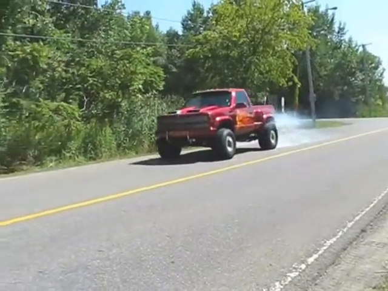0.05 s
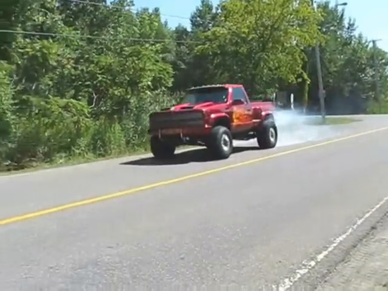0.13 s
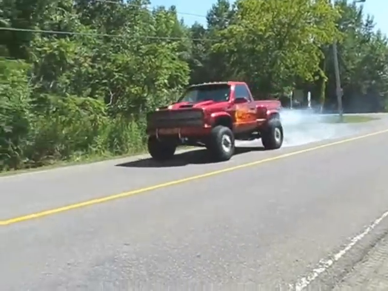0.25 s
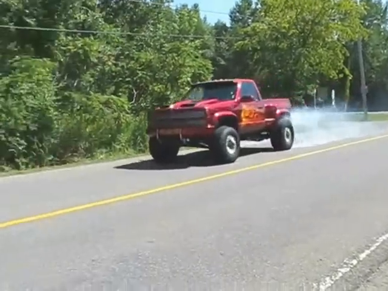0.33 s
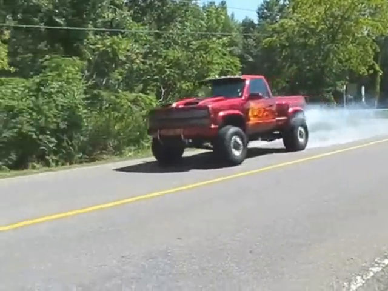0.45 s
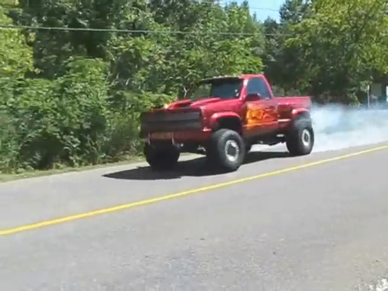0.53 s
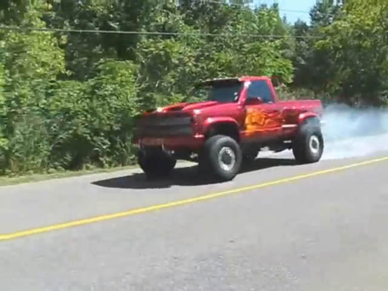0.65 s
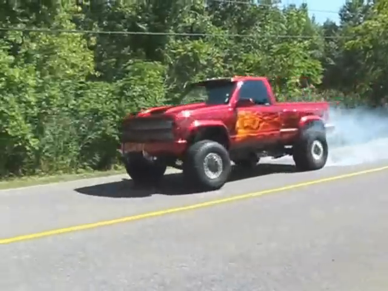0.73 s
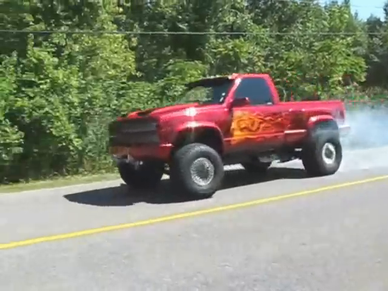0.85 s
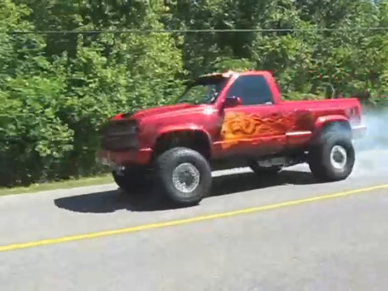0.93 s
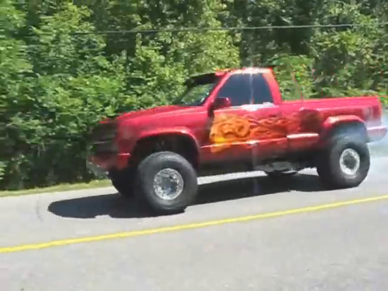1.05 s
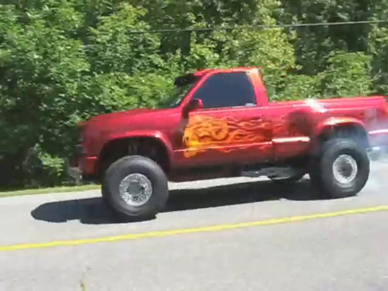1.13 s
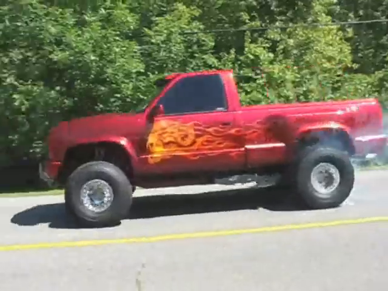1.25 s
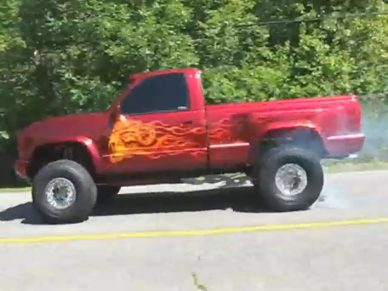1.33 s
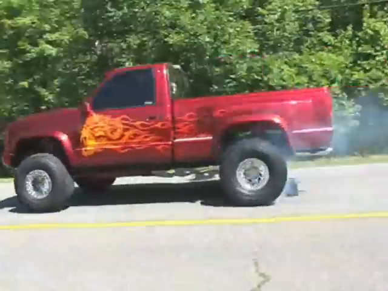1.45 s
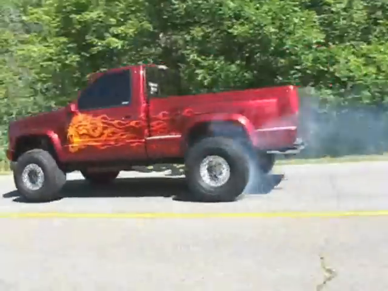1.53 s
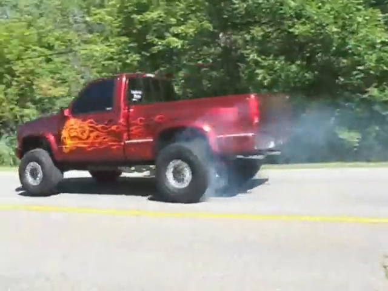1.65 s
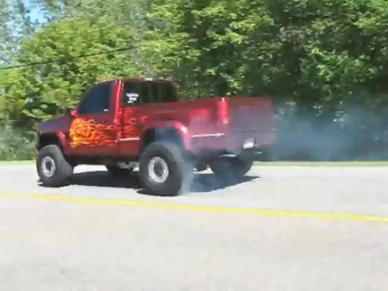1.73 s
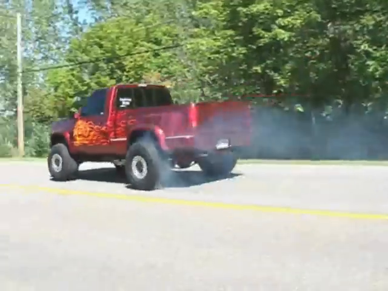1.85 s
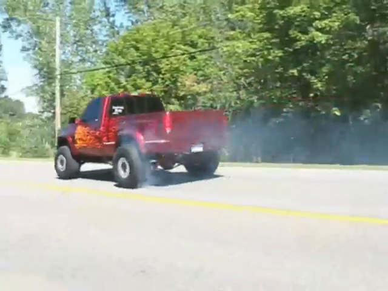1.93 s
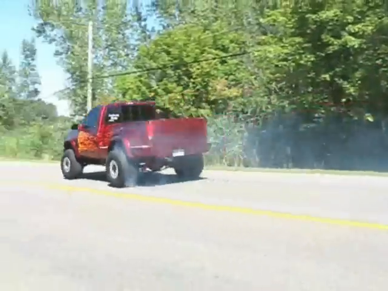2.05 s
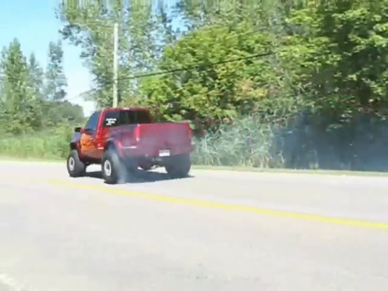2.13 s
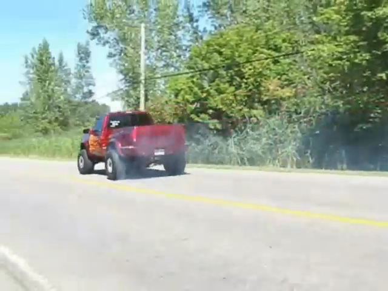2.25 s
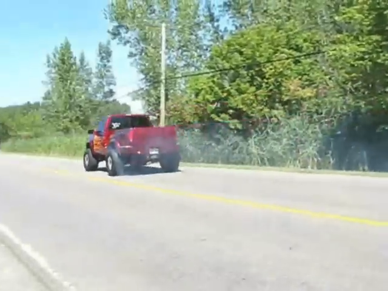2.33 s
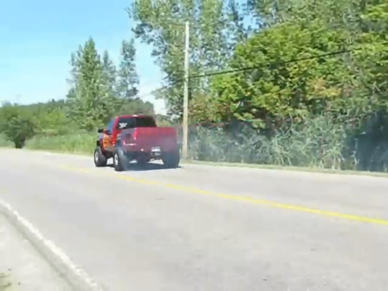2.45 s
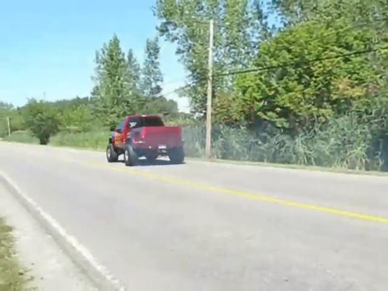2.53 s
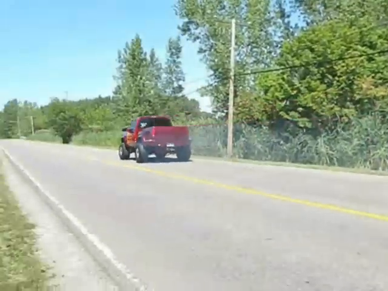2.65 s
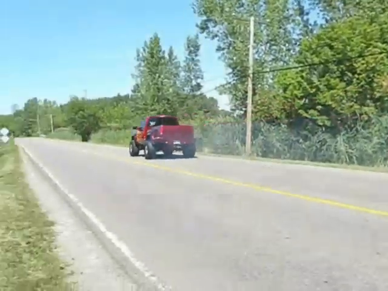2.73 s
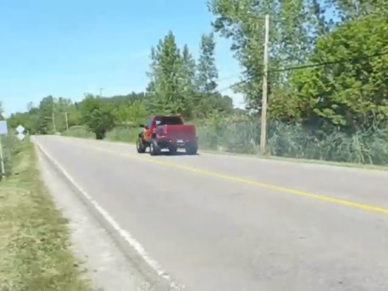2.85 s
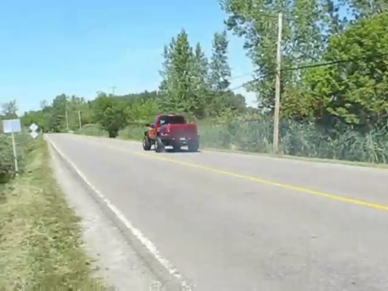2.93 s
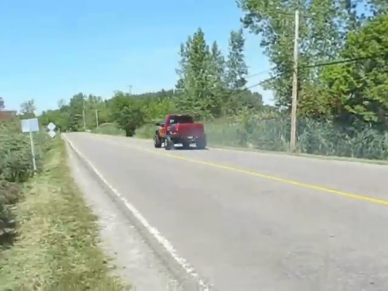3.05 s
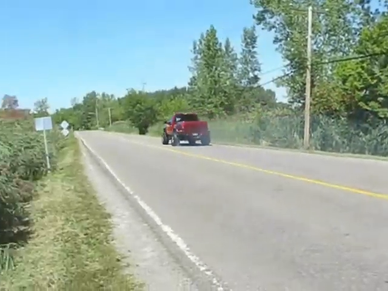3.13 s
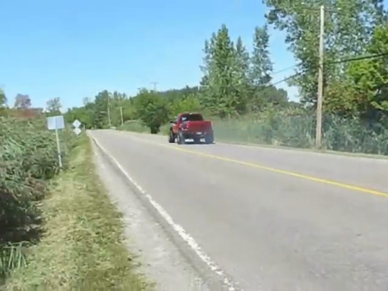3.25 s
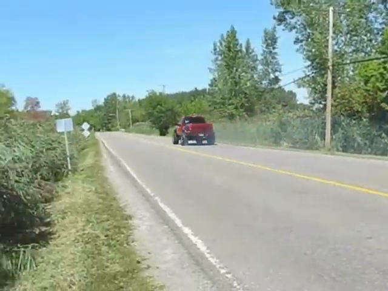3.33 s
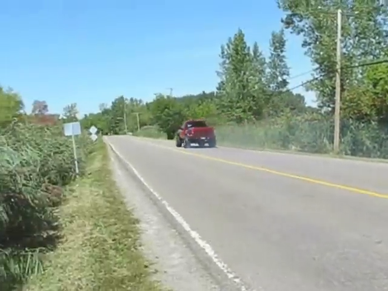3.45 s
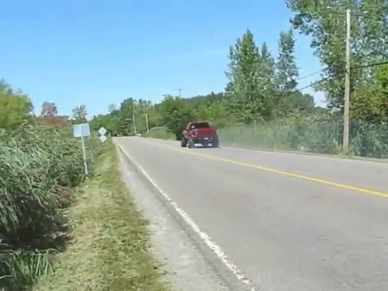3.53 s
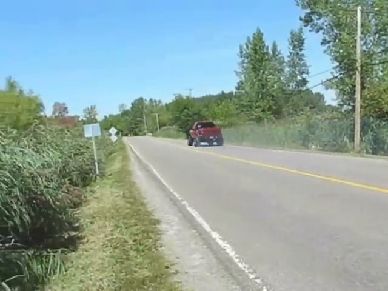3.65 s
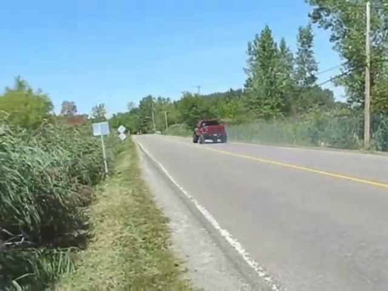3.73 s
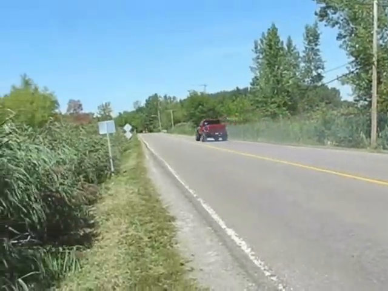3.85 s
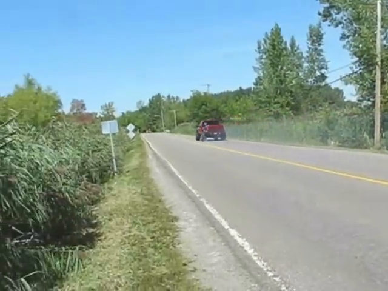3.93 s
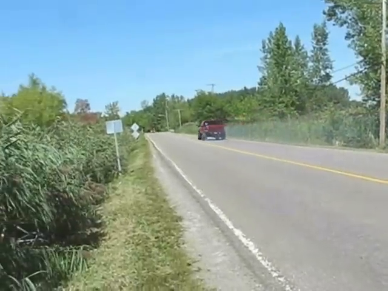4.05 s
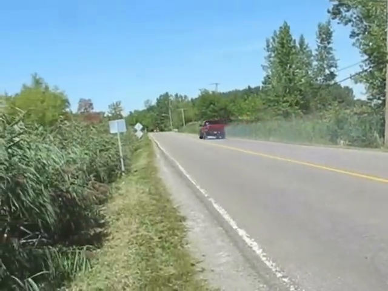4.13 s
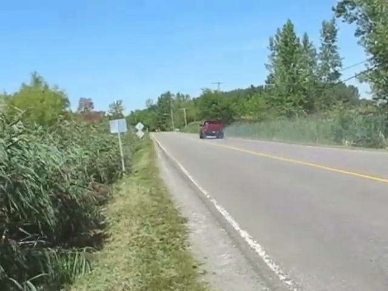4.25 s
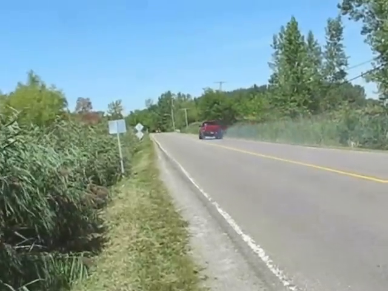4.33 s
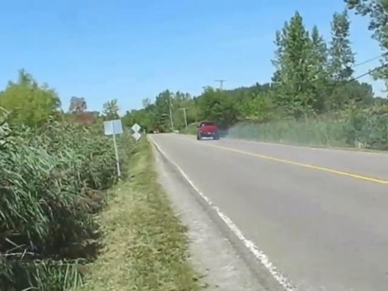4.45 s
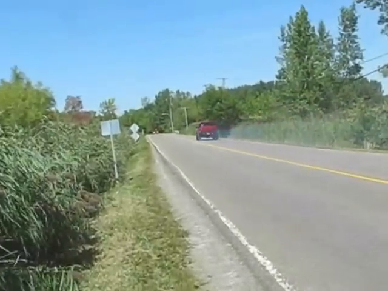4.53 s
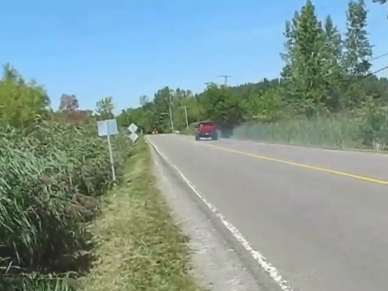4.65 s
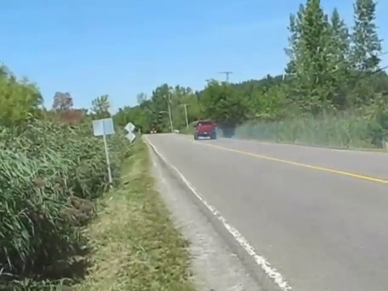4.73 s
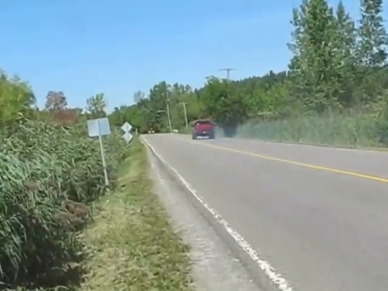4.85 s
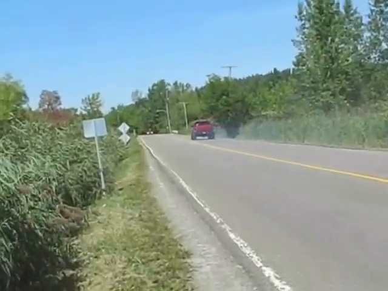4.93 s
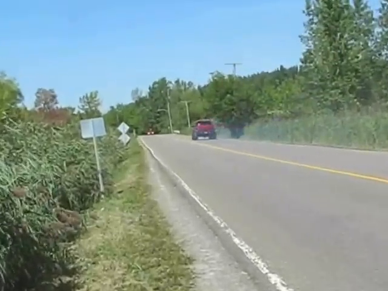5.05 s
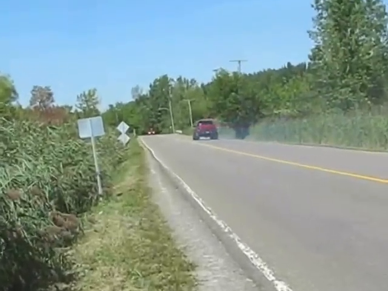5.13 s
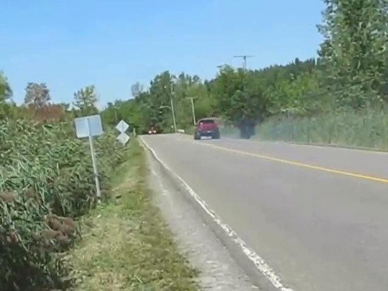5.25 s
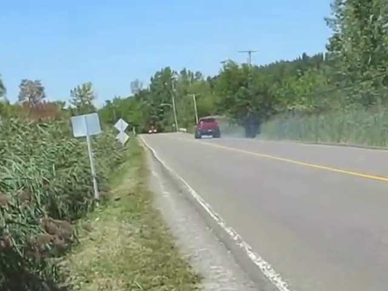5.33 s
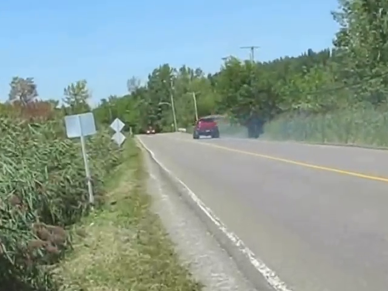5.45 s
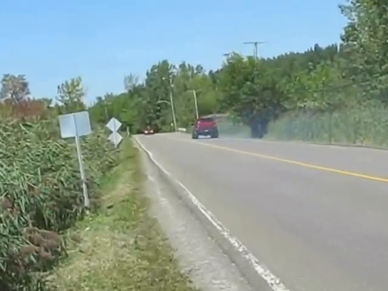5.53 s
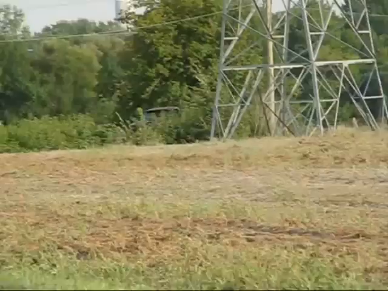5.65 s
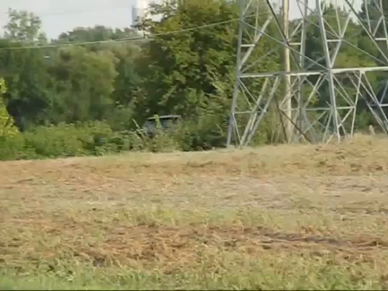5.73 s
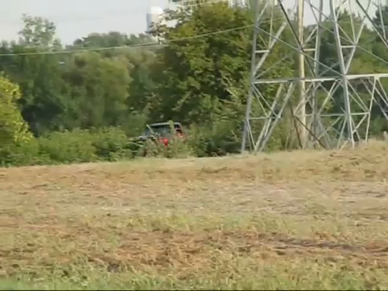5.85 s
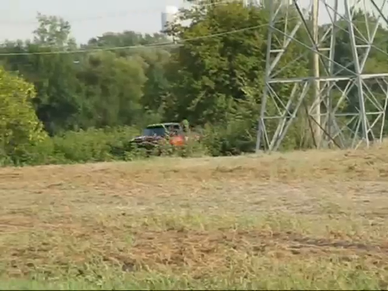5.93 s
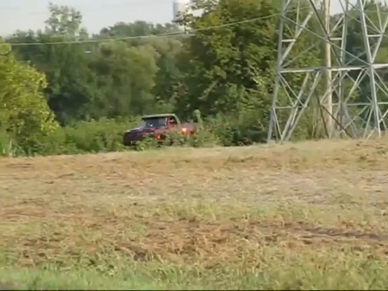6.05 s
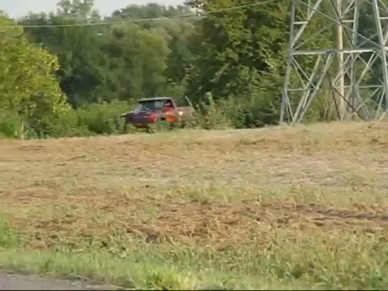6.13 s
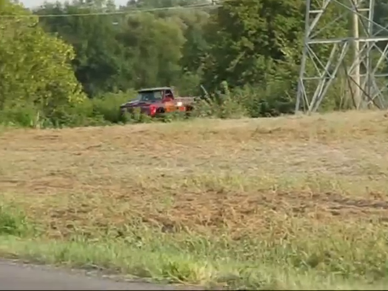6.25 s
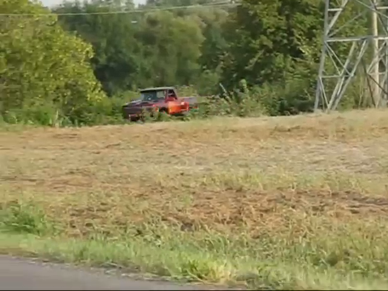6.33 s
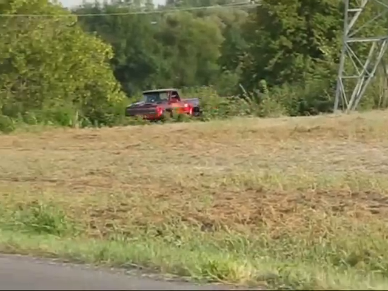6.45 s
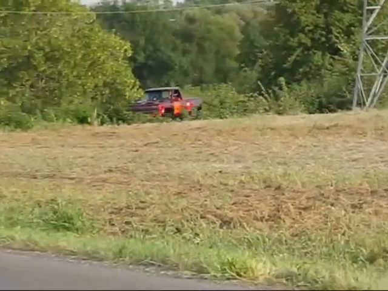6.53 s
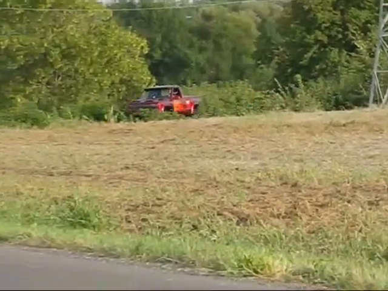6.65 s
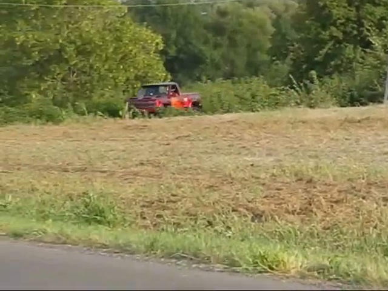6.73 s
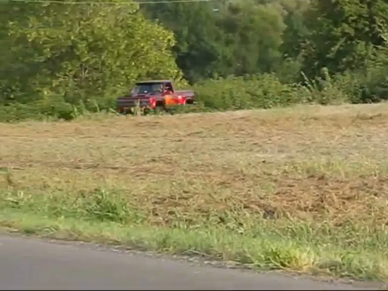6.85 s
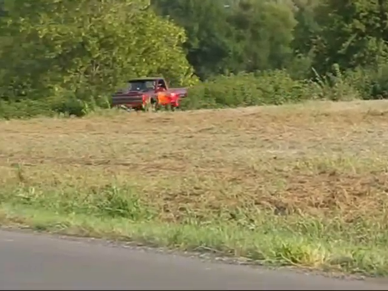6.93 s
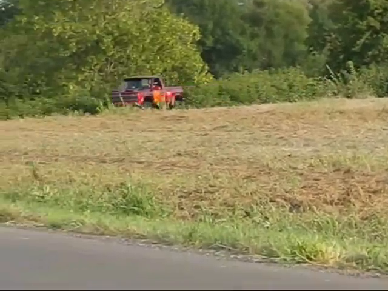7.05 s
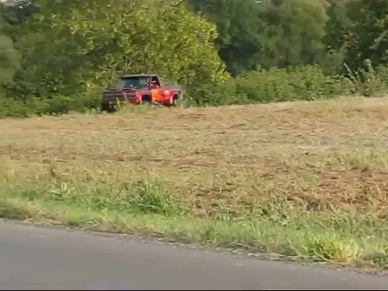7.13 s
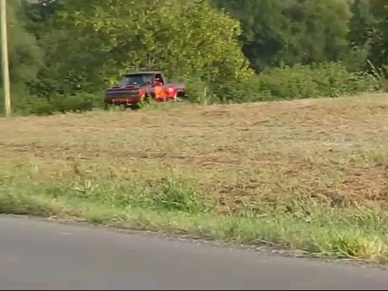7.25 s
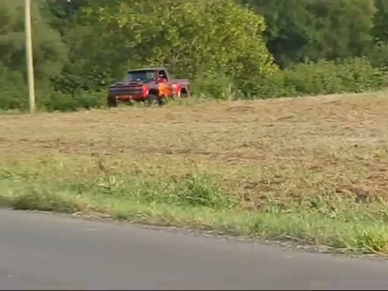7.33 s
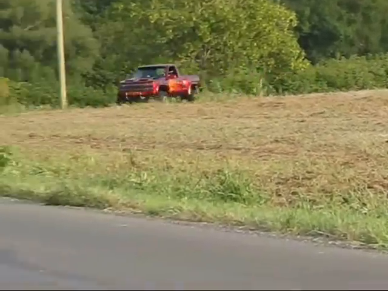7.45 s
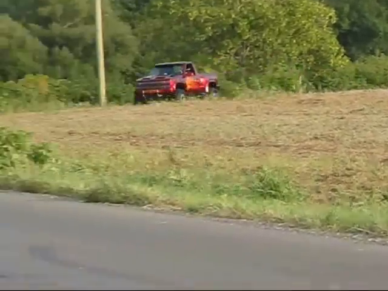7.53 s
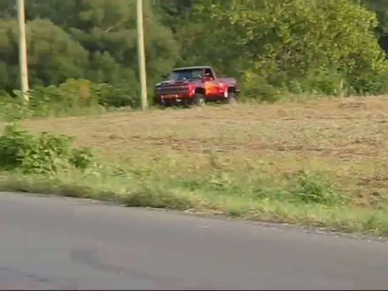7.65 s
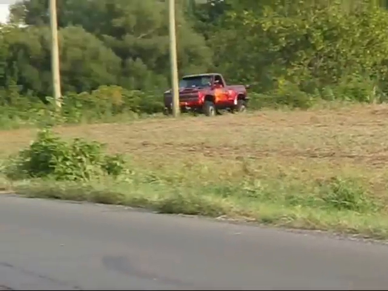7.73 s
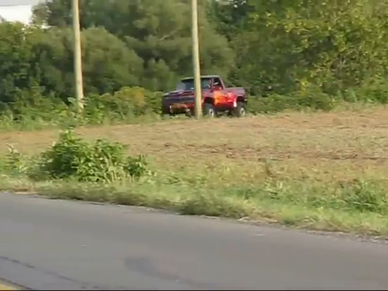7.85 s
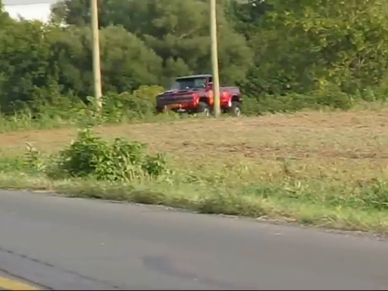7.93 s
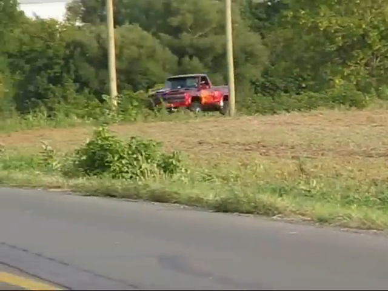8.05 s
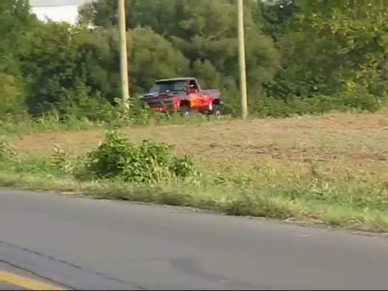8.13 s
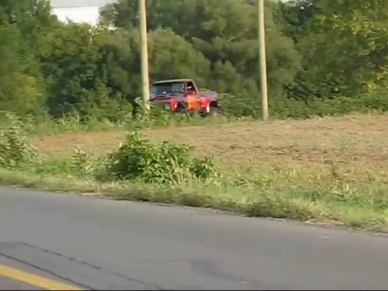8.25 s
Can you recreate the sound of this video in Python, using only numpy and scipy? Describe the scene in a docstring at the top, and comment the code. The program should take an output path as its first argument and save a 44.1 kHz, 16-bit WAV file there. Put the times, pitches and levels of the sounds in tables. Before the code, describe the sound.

From 0 s a big V8 pickup is already loud and approaching, its gravelly exhaust revving high with short throttle dips near 0, 0.7 and 1 s, over a faint, wavering tyre squeal. Around 1.3-2.3 s it passes close: heavy boom, broadband roar and hiss, slightly flattened peaks, and a strong mid-high squeal of spinning rubber. At about 2.5 s the throttle lifts, with a raspy burst as revs fall; by 2.9 s it pulls again in the next gear, fluttering slightly, then climbing steadily and fading. At 4.9 s it lifts off; irregular pops, then regular sharp cracks, run until 5.8 s. An abrupt cut reveals a quiet field. A distant muffled engine burbles low, picks up at 6.2 s and steadily deepens in power and rises to 8.3 s. Nearby crickets chirp in short groups around 5.9, 6.7 and 7.4 s, over faint ticking, thin trilling, and growing low wind buffets.

```python
"""A big V8 pickup spins its tyres past the roadside, shifts up, pulls away and lifts off, its exhaust cracking;
then, heard across a field, it accelerates from low revs while crickets and grasshoppers sing nearby.
The exhaust is multiples of the engine cycle, noise gated by the firings, and filtered pulse fronts.
Tyres and trill are narrow noise bands, insect strokes short gliding tones, wind a low band of noise around 60 Hz.
An overdriven input stage flattens the loudest peaks."""
import sys
import numpy as np
from scipy import signal
from scipy.fft import rfft, irfft, next_fast_len
from scipy.io import wavfile
from scipy.ndimage import uniform_filter1d

SR = 44100
rng = np.random.default_rng(int(sys.argv[2]) if len(sys.argv) > 2 else 0)


def store_wav(level_fs):
    """Save 16-bit WAV to argv[1]."""
    pcm = np.round(np.clip(np.atleast_2d(level_fs), -1, 1) * 32767)
    wavfile.write(sys.argv[1], SR, pcm.T.astype(np.int16))


N = 365148

CUT_S = 5.782  # road before, field after

# engine cycles per second, eight firings each: (t/s, f/Hz)
CYCLE_RATE = [(0, 47.5), (.08, 46.5), (.19, 48.1), (.37, 52.7), (.59, 54.1), (.69, 53.3), (.77, 48.7),
              (.94, 50.6), (1.02, 49.5), (1.26, 53), (1.78, 53), (1.91, 52.3), (2.49, 50.8), (2.545, 45.8),
              (2.85, 33.8), (2.9, 39.6), (2.965, 41), (2.99, 33.4), (3.05, 34), (3.12, 39), (3.2, 36),
              (3.28, 38), (3.67, 40.4), (4.17, 43), (4.49, 43.1), (4.86, 43.8), (4.91, 42.6), (4.97, 37.4),
              (5.15, 27.3), (5.3, 29.97), (5.44, 28.7), (5.78, 28.3), (5.79, 17), (6.1, 14.5), (6.27, 23),
              (6.45, 23.3), (6.56, 20.8), (6.66, 22.9), (6.96, 23.7), (7.44, 25.7), (7.62, 25.9),
              (7.69, 27.5), (8.05, 28.7), (8.28, 30.3)]


def amp(db):
    """Level in dB to amplitude."""
    return 10 ** (np.asarray(db) / 20)


def unit(x):
    """x scaled to rms 1."""
    return x / np.sqrt(np.mean(x ** 2) + 1e-20)


def along(points, hz):
    """(f/Hz, value) points interpolated on a log frequency axis."""
    f, v = np.transpose(points)
    return np.interp(np.log(hz + 1), np.log(f + 1), v)


def curves(rows):
    """One value per sample for each column after the time."""
    s, *cols = np.transpose(rows)
    return [np.interp(np.arange(N) / SR, s, c) for c in cols]


def wobble(knots_per_s):
    """Random curve, linear between normally distributed knots."""
    knots = rng.standard_normal(int(N * knots_per_s / SR) + 4)
    return np.interp(np.arange(N) * knots_per_s / SR, np.arange(len(knots)), knots)


def filtered(x, response):
    """x times a complex response of frequency."""
    m = next_fast_len(N + SR // 2)
    return irfft(rfft(x, m) * response(np.fft.rfftfreq(m, 1 / SR)), m)[..., :N]


def rush(spectrum, patchy_db):
    """Stereo noise of rms 1, wider apart left and right in the treble, with time-frequency patches of random
    gain."""
    # left-right likeness: (f/Hz, correlation)
    likeness = [(60, 0.73), (180, 1), (550, 0.87), (1650, 0.75), (4970, 0.22), (15000, 0.24)]
    z = signal.stft(rng.standard_normal((2, N)), nperseg=512)[2]
    patches = uniform_filter1d(rng.standard_normal(z.shape[1:]), 6, 0)
    patches = unit(uniform_filter1d(patches, 10, 1))
    pair = signal.istft(z * amp(patchy_db * patches), nperseg=512)[1][:, :N]

    def mid_side(hz):
        angle = np.arccos(np.clip(along(likeness, hz), -1, 1)) / 2
        return amp(along(spectrum, hz)) * [np.cos(angle), np.sin(angle)]

    mid, side = filtered(pair, mid_side)
    return unit(np.array([mid + side, mid - side]))


def fuzzy_band(rows, width_hz):
    """Noise in a narrow band that follows (t/s, f/Hz, level/dB) rows, silent outside them."""
    hz, db = curves(rows)
    fuzz = unit(filtered(rng.standard_normal((2, 2, N)), lambda f: 1 / (1 + (f / width_hz) ** 2)))
    fuzz = fuzz + 0.34 * fuzz[:, ::-1]  # partly alike left and right
    phase = 2 * np.pi * np.cumsum(hz) / SR
    t = np.arange(N) / SR
    edge = np.clip(np.minimum(t - rows[0][0] + .01, rows[-1][0] - t) / 0.0075, 0, 1)
    return amp(db) * edge * (fuzz[0] * np.cos(phase) + fuzz[1] * np.sin(phase))


def crank():
    """Engine cycles turned: the integral of the cycle rate, zero at one sharp crack."""
    crack_s = 5.5996
    turns = np.cumsum(curves(CYCLE_RATE)[0]) / SR
    return turns - turns[round(crack_s * SR)]


def levels():
    """Boom, bark, roar and hiss in dB; each lift of the throttle pulls them down, and they snap back."""
    # layer levels: (t/s, boom/dB, bark/dB, roar/dB, hiss/dB)
    road_levels = [(0, -15.5, -15, -16.5, -17), (.63, -13.5, -12.5, -13, -11.5),
                   (.9, -13, -12.5, -11.5, -13), (1.1, -10, -15, -8.5, -11), (1.35, -5.5, -13.5, -8, -9),
                   (1.65, -5, -19.5, -8, -7.5), (1.8, -11, -11.5, -12, -4.5), (1.96, -10, -13.5, -24, -6),
                   (2.29, -8.5, -11, -13, -11.5), (2.5, -11, -14.5, -15, -15.5),
                   (2.64, -12.5, -15, -14.5, -8), (2.84, -11.5, -15, -15, -13), (2.9, -10, -12.5, -14, -13),
                   (3.1, -12, -18.5, -17.5, -20), (3.85, -15, -18.5, -20, -21.5),
                   (4.31, -15, -22.5, -23, -27), (4.9, -16.5, -26.5, -26.5, -29),
                   (4.95, -28.5, -34, -31.5, -35.5), (5.18, -37, -40, -29.5, -43),
                   (5.33, -31.5, -31.5, -28, -39), (5.775, -32.5, -29.5, -35.5, -40)]
    # the same columns across the field
    field_levels = [(5.785, -44, -47, -53, -55), (6.09, -45, -60, -63, -71), (6.16, -28.5, -49, -55, -64),
                    (6.27, -25, -43.5, -67, -73), (6.7, -26, -43, -63, -60), (7.07, -18.5, -40, -41.5, -64),
                    (7.4, -18, -38, -34.5, -56), (7.65, -21.5, -39, -43.5, -61),
                    (7.83, -18.5, -36.5, -31.5, -57), (8.28, -19, -34.5, -31, -50)]
    # throttle closes briefly: (t/s, length/s, drop before layer share/dB)
    lifts = [(0.035, 0.1, 3.5), (0.681, 0.12, 4.5), (.96, 0.076, 4), (2.51, 0.353, 5.5)]
    # share of a drop taken by boom, bark, roar, hiss: (factor)
    drop_share = [0.9, 1.38, 1.12, 0.36]
    close_s, open_s = 0.014, 0.0091
    sag_db_per_s = [5.6, 5, 4.1, 37]  # boom, bark, roar, hiss
    t, out = np.arange(N) / SR, np.array(curves(list(road_levels) + list(field_levels)))
    for s, length_s, drop_db in lifts:
        shut = np.clip(np.minimum((t - s) / close_s, (s + length_s - t) / open_s), 0, 1)
        out = out - shut * (np.outer(drop_share, [drop_db]) + np.outer(sag_db_per_s, t - s))
    return out


def tones(turns, first, last, scatter_db, drift_rad):
    """Multiples of the cycle at steady nominal power, wavering with unsteady firing, sliding through resonances."""
    # relative strength of the cycle's multiples, five sets: (multiple, level/dB)
    spinning = [(1, -19), (2, -10), (3, -4), (4, -2.5), (5, -1.5), (6, -1), (7, -29), (8, -11.5), (9, -2),
                (10, -7), (11, -24), (12, -16), (13, -13), (14, -3), (15, -11), (16, 1), (17, 4), (18, -1),
                (19, -15), (20, -9), (21, -9), (22, -1), (23, -22), (24, -15), (25, -17), (26, -24),
                (27, -15), (28, -19), (29, -9), (30, -3)]
    passing = [(1, -38), (2, -11.5), (3, -14.5), (4, -9), (5, -3), (6, -3.5), (7, -23), (8, 0), (9, -24),
               (10, -17.5), (11, -33), (12, -13), (13, -1), (14, 1), (15, -9), (16, -5.5), (17, -3),
               (18, -7), (19, -4), (20, -11), (21, -18), (22, -27), (23, -29), (24, -38), (25, -24),
               (26, -31), (27, -7), (28, -27), (29, -4), (30, -12)]
    leaving = [(1, -36), (2, -57), (3, -6.5), (4, -8.5), (5, 1), (6, -10.5), (7, -18.5), (8, -7.5),
               (9, -6.5), (10, -28.5), (11, -27), (12, -14.5), (13, -31), (14, -11.5), (15, -7.5),
               (16, -7.5), (17, -1.5), (18, -10), (19, -39), (20, -12), (21, -20), (22, -37), (23, -12.5),
               (24, -23), (25, -11), (26, -25), (27, -48), (28, -9.5), (29, -38), (30, -32)]
    coasting = [(1, -29), (2, -24), (3, -2), (4, -1), (5, 7), (6, -19), (7, -14), (8, 3), (9, 1.5),
                (10, -9), (11, 2), (12, 1.5), (13, -18), (14, -7), (15, -20), (16, -24), (17, -15),
                (18, -14), (19, -21), (20, 2.5), (21, 3), (22, -9), (23, 2), (24, -16), (25, -7), (26, -16),
                (27, -6), (28, -6.5), (29, -4), (30, -19)]
    across = [(1, -29), (2, -54), (3, -10.5), (4, -6.5), (5, -3), (6, 2), (7, -9), (8, 0.5), (9, -1),
              (10, -26), (11, -9), (12, -14), (13, -16.5), (14, -35), (15, -24), (16, -44), (17, -32),
              (18, -49), (19, -36), (20, -27.5), (21, -34), (22, -47), (23, -27.5), (24, -31), (25, -24.5),
              (26, -39), (27, -34), (28, -22.5), (29, -31), (30, -23)]
    # firing: (t/s, set 0-4 in the order above, unsteadiness 0-1, load tilt/dB per octave, drone boost/dB)
    stages = [(0, 1.74, 0.45, -3, 6.5), (.4, 0, 0.21, -6, -2.5), (.68, 0, .25, 1, -8),
              (.76, 0, 0.79, -2, 0), (.84, 0.5, 0.29, -1, 0.5), (1.15, 0.8, 0.24, -8, -4.5),
              (1.27, 0.7, 0.06, -1, 5), (1.75, 0.74, 0.24, 3, 3), (2.0, 1, 0.25, -0.5, -4),
              (2.5, 1, 0.14, -1.5, -1.5), (2.62, 3.5, 0.18, -11, 4), (2.84, 2, 0.2, -12, 3.5),
              (2.87, 2, 0.57, 5, -3.5), (3.0, 2, 0.35, 8.5, -6), (3.3, 2.5, 0.15, 0.5, -5.5),
              (4.1, 2, 0.09, 4.5, 2.5), (4.9, 2, 0.13, -3, 2.5), (5.0, 3.5, 0.15, -13, -2),
              (5.2, 2.4, 0.24, -4, 2), (5.35, 3, 0.03, 4, 0), (5.78, 2.5, .03, 5, .5),
              (5.79, 4, 0.6, -10, 3), (6.25, 4, 0.27, -7, 2), (6.4, 4, 0.54, -6.5, -3),
              (6.62, 4, .08, -4, 2), (7, 4, .04, .5, 0), (7.6, 4, .05, -3.5, 0), (8.28, 4, 0.14, 0, -18)]
    # exhaust resonances on the road: (f/Hz, gain/dB)
    road_pipe = [(75, -5), (112, -2.5), (130, 1), (150, -1.5), (200, -1), (260, 4), (305, 3), (370, 0),
                 (430, -0.5), (600, 2), (720, 2.5), (860, 3.5), (930, -4), (1100, -4.5), (1600, 0)]
    # exhaust resonances across the field: (f/Hz, gain/dB)
    field_pipe = [(70, 0.5), (115, 7), (160, -8), (222, 6.5), (260, 0.5), (320, 1), (500, 3.5), (900, -0.5)]
    drone, firing = 5, 8  # multiple that drones, multiple where all cylinders fire; the tilt lies between
    road_sweep, field_sweep = -.12, .3  # each multiple peaks this share of a cycle after the one below

    stage, unsteady, tilt_db, drone_db = curves(stages)
    sets = np.array([spinning, passing, leaving, coasting, across])
    at = np.arange(0, N, 128)  # control samples
    revs = curves(CYCLE_RATE)[0][at]
    sweep = np.where(np.arange(N) < CUT_S * SR, road_sweep, field_sweep)
    total, power = 0, 0
    for k in range(first, last + 1):
        hz = k * revs
        gain_db = np.where(at < CUT_S * SR, along(road_pipe, hz), along(field_pipe, hz))
        gain_db = gain_db + tilt_db[at] * np.log2(np.clip(k, drone, firing) / drone)
        gain_db = gain_db + drone_db[at] * (k == drone)
        gain_db = gain_db + np.interp(stage[at], np.arange(len(sets)), sets[:, k - 1, 1])
        gain = np.interp(np.arange(N), at, amp(gain_db))
        phase = 2 * np.pi * (k * turns - sweep * k ** 2 / 2) + drift_rad * unsteady * wobble(24)
        waver = amp(scatter_db * (unsteady + 0.2741) * wobble(12))
        total = total + gain * waver * np.sin(phase)
        power = power + gain ** 2 / 2
    return total / np.sqrt(power)


def gas_noise(roar_db, hiss_db):
    """Exhaust roar and hiss: coloured noise, duller with distance and across the field."""
    # relative noise density: (f/Hz, level/dB)
    near_roar = [(18, -53), (30, -34), (75, -31.5), (106, -8), (229, -2), (337, 1.5), (445, -14.5),
                 (728, 1), (922, -5), (1240, -1.5), (5000, -16), (6500, -27), (11000, -120)]
    far_roar = [(18, -53), (30, -56), (137, -15), (189, -7.5), (352, -8), (465, -8), (713, -6),
                (942, -11.5), (1610, -1.5), (2310, -7.5), (5000, -21), (6500, -21), (11000, -120)]
    # heard across the grass
    field_roar = [(180, -28), (300, 0.5), (410, -24), (768, -7.5), (1020, -31), (1400, -13), (4220, -19.5),
                  (6000, -24), (7800, -47), (13200, -120)]
    near_hiss = [(1760, -3.5), (3000, -1.5), (9670, -8.5), (14300, -18), (15600, -24)]
    # air has eaten the top
    far_hiss = [(1470, -20), (2500, -1), (3100, -1.5), (5090, -7.5), (9390, -14), (13100, -27),
                (15200, -60), (15600, -48)]
    # (t/s, share of the far spectra 0-1)
    distance = [(0, 0.2), (1.5, 0.2), (2.6, 0.17), (3.5, 0.28), (4.9, 0.96), (5.1, 1), (8.28, 1)]
    far = np.clip(curves(distance)[0], 0, 1)

    def blend(near, away):
        return np.sqrt(1 - far) * rush(near, patchy_db=1.5) + np.sqrt(far) * rush(away, patchy_db=0.2)

    on_road = np.arange(N) < CUT_S * SR
    roar = np.where(on_road, blend(near_roar, far_roar), rush(field_roar, patchy_db=1.0))
    hiss = blend(near_hiss, far_hiss)
    return amp(roar_db + 1.26 * wobble(15)) * roar + amp(hiss_db + 0.27 * wobble(23)) * hiss


def roadside(x):
    """Bushes and verge answer: a short scattered tail that differs left and right."""
    t = np.arange(round(.12 * SR)) / SR
    tail = rng.standard_normal((2, len(t))) * amp(-60 * t / 0.33)
    tail = amp(-31.5) * tail / np.linalg.norm(tail[0])
    answer = signal.fftconvolve(x[None], tail, axes=1)[:, :N]
    sounding = np.abs(np.arange(N) / SR - CUT_S - .06) > .06  # no tail in the field's first 0.12 s
    return x + answer * sounding


def truck():
    """Exhaust tones and pulse fronts, plus roar, hiss and a wandering treble rasp gated by the firings."""
    # relative exhaust pulse of each firing in the cycle: (level/dB)
    cylinders = [4.5, -15, -20, -11, -17, -13, -9, -11]
    # rasp: a narrow treble band that wanders in pitch, before gating, two bursts: (t/s, f/Hz, level/dB)
    rasp_bursts = [
        [(2.54, 3000, -32), (2.59, 3214, -17), (2.63, 3336, -19), (2.68, 3180, -22.5), (2.76, 2990, -38)],
        [(5.25, 3500, -50), (5.32, 3700, -34), (5.38, 3574, -43), (5.44, 2794, -37), (5.57, 2894, -29),
         (5.65, 3330, -32), (5.777, 2990, -45)],
    ]
    turns = crank()
    boom_db, bark_db, roar_db, hiss_db = levels()
    boom = amp(boom_db) * tones(turns, first=1, last=11, scatter_db=5.0, drift_rad=2.2)
    bark = amp(bark_db) * tones(turns, first=12, last=30, scatter_db=6.0, drift_rad=4.45)

    firing = np.floor(8 * turns).astype(int)
    jitter_db = 0.25 * rng.standard_normal(firing.max() - firing.min() + 1)
    strength_db = np.take(cylinders, firing % 8) + jitter_db[firing - firing.min()]
    since = 8 * turns - firing  # share of the gap to the next firing
    gate = unit(1 + 1.07 * amp(0.92 * strength_db) * np.exp(-since / 0.22))
    fronts = amp(strength_db) * (np.diff(firing, prepend=firing[0]) > 0)

    rasp = sum(fuzzy_band(rows, width_hz=630) for rows in rasp_bursts)
    noise = gate * (gas_noise(roar_db, hiss_db) + rasp)
    return roadside(boom + bark + blat(fronts) + cracks(fronts)) + bounced(noise)


def tyres():
    """Rubber slipping on asphalt: a narrow noise band that wanders in pitch."""
    # squeal of spinning tyres: (t/s, f/Hz, level/dB)
    squeal = [(0.0, 1660, -28), (0.15, 1513, -26), (0.39, 1620, -27), (0.85, 1629, -28), (0.97, 1666, -29),
              (1.45, 1724, -10.5), (1.6, 1644, -17), (1.8, 1739, -14), (2.18, 1737, -12), (2.32, 1560, -31),
              (2.48, 1595, -35), (2.6, 1428, -30), (2.9, 1460, -26)]
    return fuzzy_band(squeal, width_hz=160)


def wind():
    """Slow buffeting: a low band of noise around 60 Hz, partly its own at each microphone port."""
    # wind on the microphone: (t/s, level/dB)
    buffet = [(0, -29), (1.3, -33.5), (2.3, -34), (3.3, -42), (5.7, -46), (5.83, -42), (6.3, -36),
              (8.28, -25)]
    puffs = rng.standard_normal((3, N)) * amp(5.2 * wobble(4.2))
    shared = 4.8 * puffs[2]
    lows = filtered(puffs[:2] + shared, lambda hz: (hz / 45) ** 2 / (1 + (hz / 60) ** 4))
    return amp(curves(buffet)[0]) * unit(lows)


def bounced(x):
    """Direct sound plus its delayed copy off the road, weighted for unchanged total power."""
    # bounce at the close pass: (t/s, delay/ms, strength 0-1)
    ground = [(1.35, .74, 0), (1.6, .71, .2), (1.9, .64, .25), (2.2, .58, .15), (2.45, .52, 0)]
    delay_ms, strength = curves(ground)
    late = np.arange(N) - delay_ms * SR / 1000
    copy = np.array([np.interp(late, np.arange(N), channel) for channel in x])
    return (x + strength * copy) / np.sqrt(1 + strength ** 2)


def blat(fronts):
    """Under load each pulse front rings the tailpipe's band-pass resonances."""
    # pulse fronts under load, heard from behind: (t/s, level/dB)
    load = [(2.86, -16), (3.2, -30.5), (3.6, -23), (4.1, -29), (4.5, -35), (4.91, -41)]
    # tailpipe resonances: (f/Hz, width/Hz, relative level/dB)
    resonances = [(1234, 99, 2), (1890, 100, -2)]
    t = np.arange(N) / SR
    loaded = (t > load[0][0]) & (t < load[-1][0])

    def pipe(f):
        total = 0
        for k, (centre, width, db) in enumerate(resonances):
            damping = 1j * f * width
            total = total + (-1) ** k * amp(db) * damping / (centre * centre - f * f + damping)
        return total

    return amp(curves(load)[0]) * loaded * unit(filtered(fronts, pipe))


def cracks(fronts):
    """Each pulse front steepens into a snap, a push and a pull, with a ragged puff; a verge sends it back."""
    # pulse fronts off throttle: (t/s, relative level/dB)
    snaps = [(5.3, -5.5), (5.5, -4.5), (5.67, -1), (5.78, -6)]
    # stray backfires off throttle, before the regular cracks: (t/s, relative level/dB)
    pops = [(5.02, -5), (5.0814, -1), (5.177, -10), (5.191, -6), (5.22, -6), (5.2602, -4), (5.2935, -4)]
    # colour of a crack: (f/Hz, gain/dB)
    colour = [(410, -16), (700, -1), (958, -11.5), (1290, -5), (1360, -12), (4470, -11.5), (8500, -23),
              (11500, -42), (14000, -65)]
    verge_db, verge_s = -10, .0062
    off_throttle = (np.arange(N) > snaps[0][0] * SR) & (np.arange(N) < CUT_S * SR)
    fronts = amp(curves(snaps)[0]) * off_throttle * fronts
    for s, db in pops:
        fronts[round(s * SR)] = amp(db)
    fronts = fronts + amp(verge_db + 3.0 * wobble(30)) * np.roll(fronts, round(verge_s * SR))
    t = np.arange(round(0.0046 * SR)) / SR
    snap = np.sin(2 * np.pi * 2600 * t) * np.exp(-((t - .0002) / 0.00015) ** 2)
    puff = signal.fftconvolve(fronts, np.exp(-t / 0.0019))[:N] * rng.standard_normal(N)
    burst = signal.fftconvolve(fronts, snap)[:N] + .5 * puff
    return filtered(amp(4.5) * burst, lambda hz: amp(along(colour, hz)))


def chirp(hz, length_s, fall, knee, second_db, third_db):
    """One wing stroke: a short tone whose pitch holds, then sags, with two overtones."""
    t = np.arange(round(length_s * SR)) / SR
    u = t / length_s
    phase = 2 * np.pi * np.cumsum(hz * (1 - fall * np.clip(u - knee, 0, 1) ** 2)) / SR
    swell = u ** 0.95 * (1 - u) ** 1.28 * 3.3
    return swell * (np.sin(phase) + amp(second_db) * np.sin(2 * phase) + amp(third_db) * np.sin(3 * phase))


def cricket():
    """Near cricket: wing strokes in groups of up to three."""
    # strokes, each starting 8 ms before t: (t/s, level/dB, nominal f/Hz)
    strokes = [(5.8277, -35, 4000), (5.8666, -32, 4290), (5.9135, -32.5, 4260), (6.1, -52, 4310),
               (6.1419, -44, 4320), (6.6258, -36, 3930), (6.6649, -31, 4260), (6.7067, -30, 4290),
               (7.3088, -38, 3864), (7.3452, -30, 4274), (7.3865, -29, 4253), (8.2062, -28, 4220)]
    opening_hz = 4100  # a lower stroke opens a group: shorter, sliding nearly all the way
    out = np.zeros(N + SR)
    for s, db, hz in strokes:
        if hz < opening_hz:
            stroke = chirp(hz * 1.06, .018, fall=.2, knee=.02, second_db=-17, third_db=-21)
        else:
            stroke = chirp(hz, 0.027, fall=0.7, knee=0.49, second_db=-16.5, third_db=-21)
        out[round((s - .008) * SR):][:len(stroke)] += amp(db) * stroke
    return out[:N]


def ticking_insect():
    """Evenly spaced 6 kHz wing strokes of varying level."""
    out = np.zeros(N + SR)
    stroke = chirp(6000, 0.029, fall=.15, knee=.3, second_db=-9, third_db=-60)
    for s in np.arange(5.793, N / SR, .0887):
        out[round(s * SR):][:len(stroke)] += amp(-47.5 + 2.1 * rng.standard_normal()) * stroke
    return out[:N]


def insect_trill():
    """Faint narrow-band noise pulsing 75 times a second."""
    trill = fuzzy_band([(CUT_S, 6700, -60), (8.28, 6700, -60)], width_hz=140)
    return trill * np.sin(np.pi * 75 * np.arange(N) / SR) ** 2 * amp(4.0 * wobble(3.48))


def meadow():
    """Near insects and trill over a far background of coloured noise."""
    # far traffic, leaves and an insect chorus, relative density: (f/Hz, level/dB)
    background = [(15, -41), (25, -12), (113, -5), (215, -11.5), (400, -25.5), (827, -17.5), (921, -13),
                  (2930, -37), (3840, -39), (5300, -22), (6230, -48), (6750, -36), (8840, -45),
                  (11900, -44.5), (15600, -51)]
    far = amp(-34) * rush(background, patchy_db=0.7) * (np.arange(N) >= CUT_S * SR)
    near = (cricket() + ticking_insect()) * amp([[-.8], [.8]])  # slightly right
    return near + insect_trill() + far


def scene():
    """Truck and tyres panned by level difference, plus meadow and wind."""
    # (t/s, left minus right level/dB)
    pan = [(0, -1), (2.1, -0.5), (5.1, -1.5), (6.2, -0.9), (8.28, -1)]
    pan_db = curves(pan)[0]
    return (truck() + tyres()) * amp([pan_db / 2, -pan_db / 2]) + meadow() + wind()


def record(dry):
    """The input stage flattens the loudest peaks, rolls off the deep bass and stops at the band limit."""
    top_hz = 15714
    flat = dry / (1 + np.abs(dry / 0.55) ** 5) ** (1 / 5)
    return filtered(flat, lambda hz: (hz < top_hz) * (1j * hz / (40 + 1j * hz)) ** 2)


dry = scene()
out = record(dry)
store_wav(out)
```